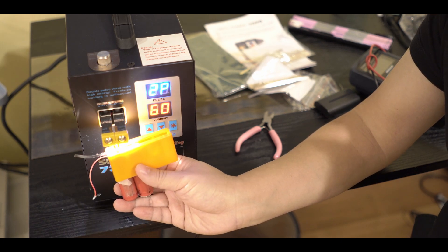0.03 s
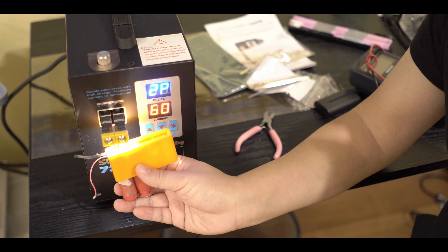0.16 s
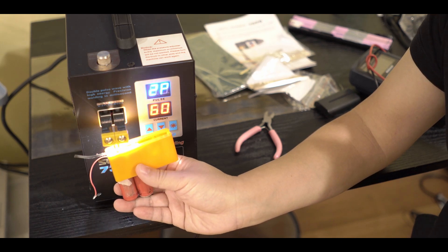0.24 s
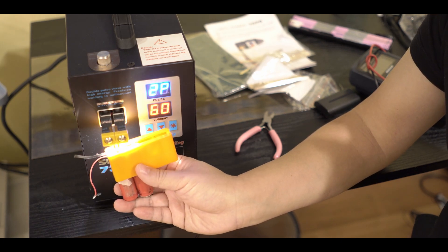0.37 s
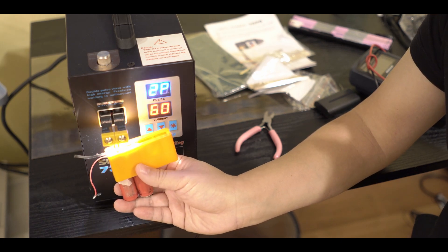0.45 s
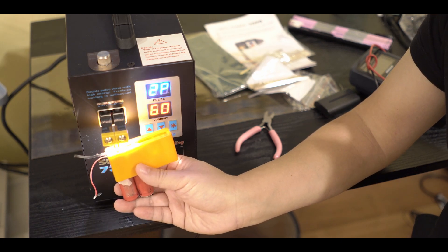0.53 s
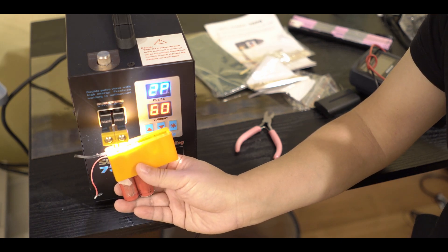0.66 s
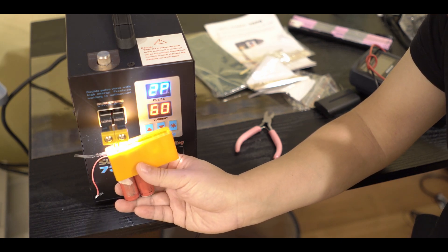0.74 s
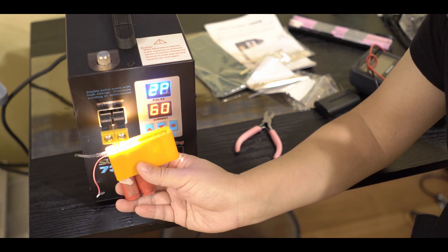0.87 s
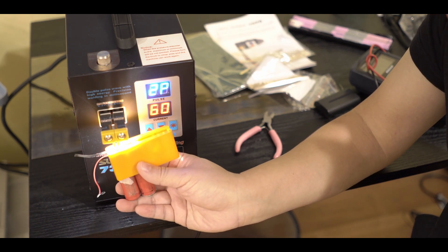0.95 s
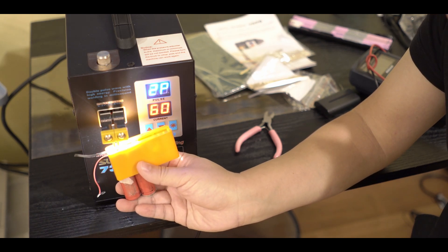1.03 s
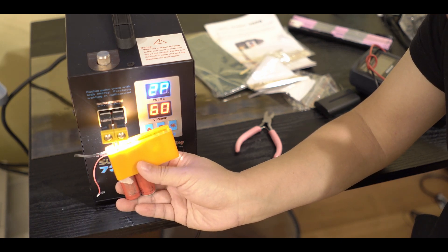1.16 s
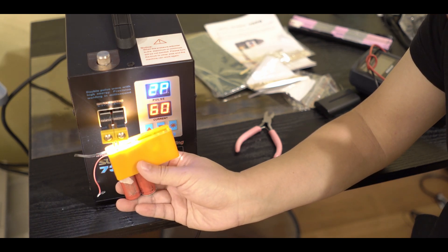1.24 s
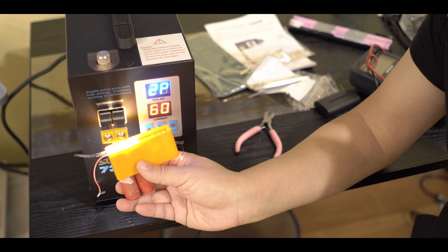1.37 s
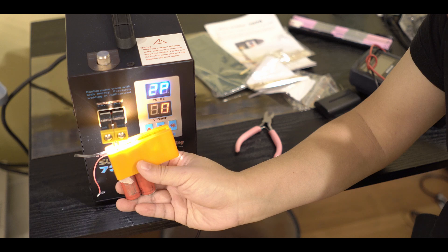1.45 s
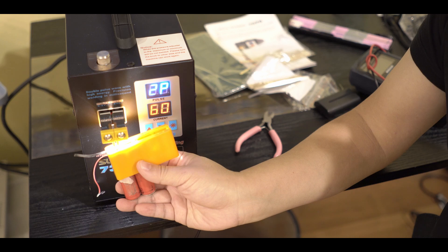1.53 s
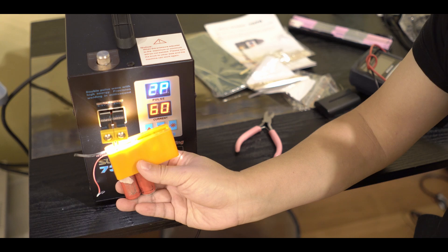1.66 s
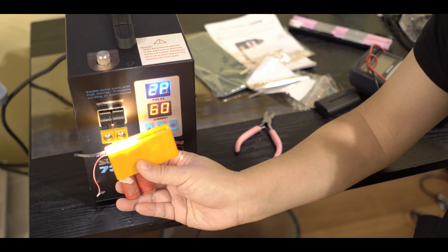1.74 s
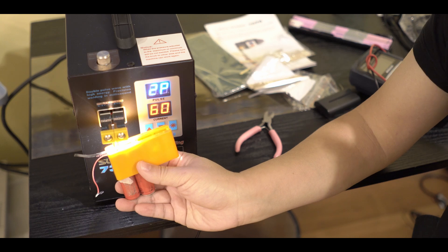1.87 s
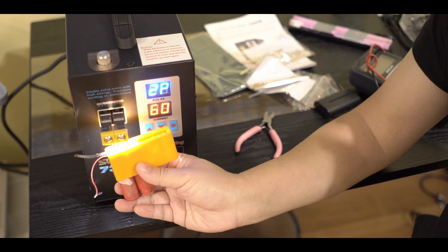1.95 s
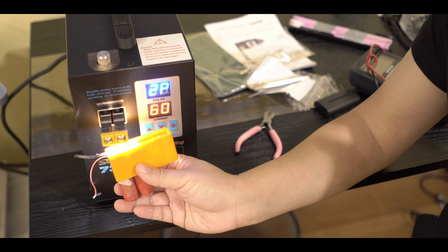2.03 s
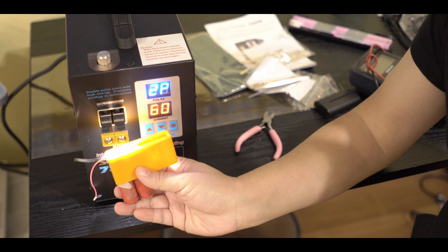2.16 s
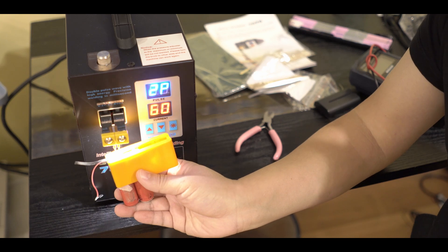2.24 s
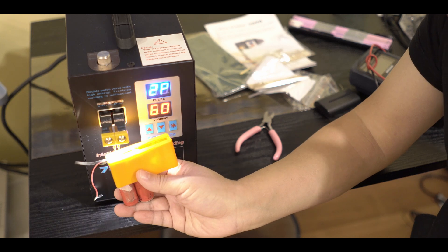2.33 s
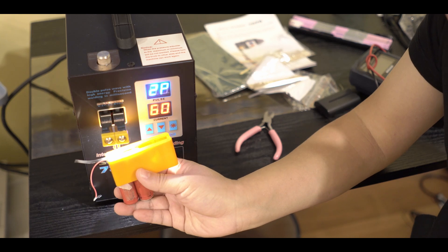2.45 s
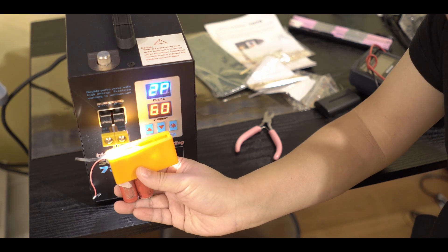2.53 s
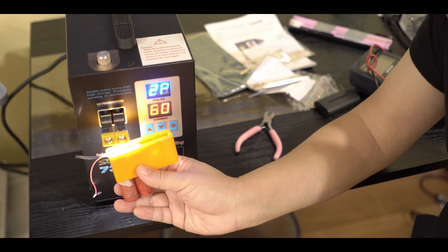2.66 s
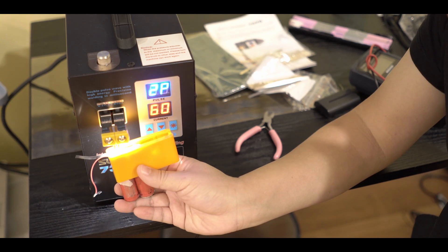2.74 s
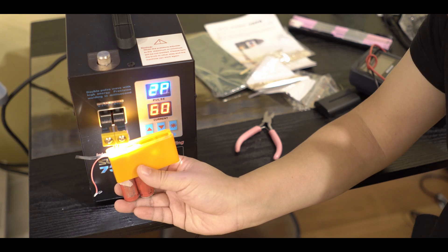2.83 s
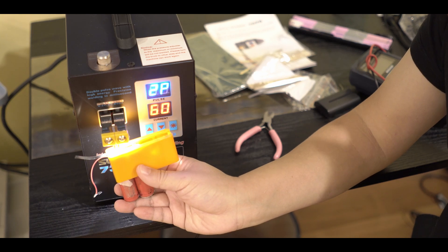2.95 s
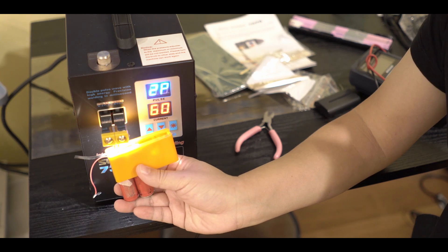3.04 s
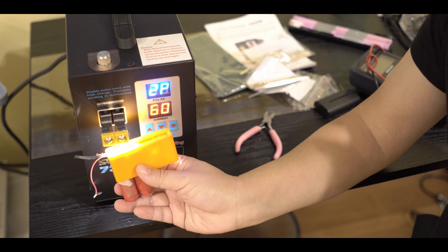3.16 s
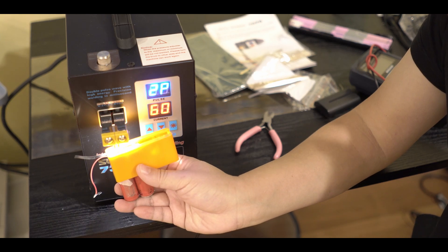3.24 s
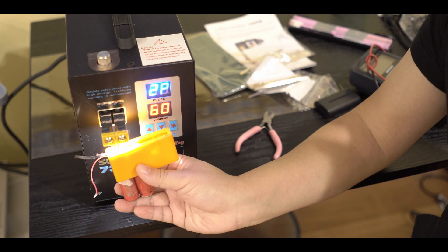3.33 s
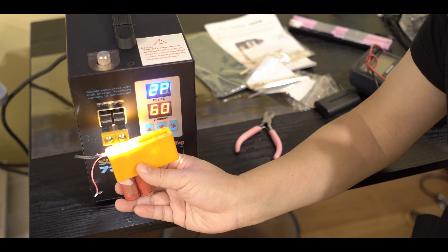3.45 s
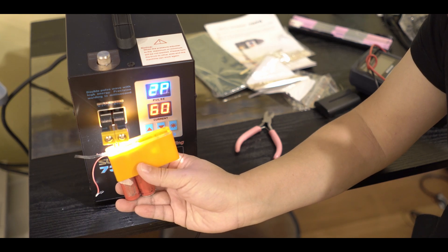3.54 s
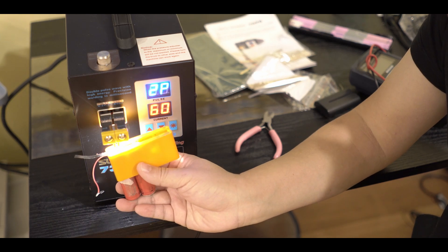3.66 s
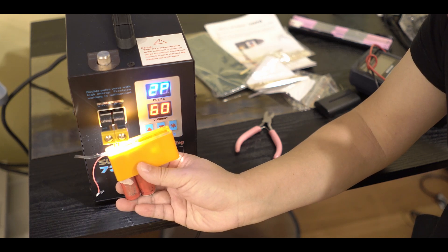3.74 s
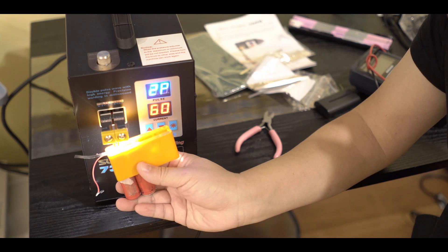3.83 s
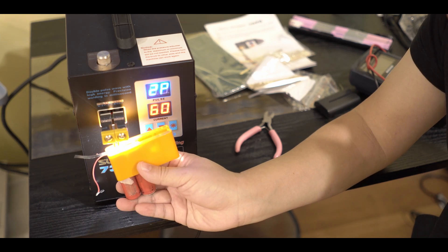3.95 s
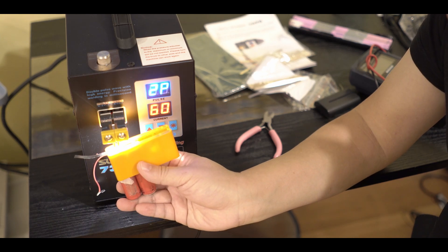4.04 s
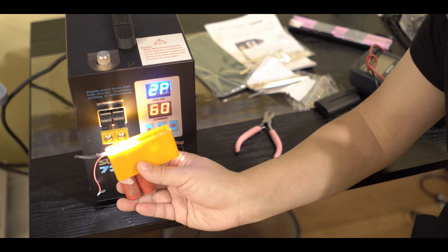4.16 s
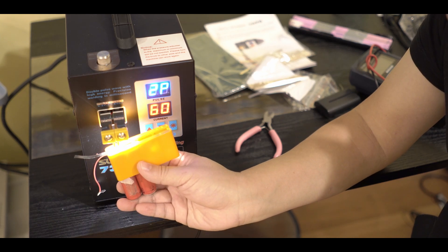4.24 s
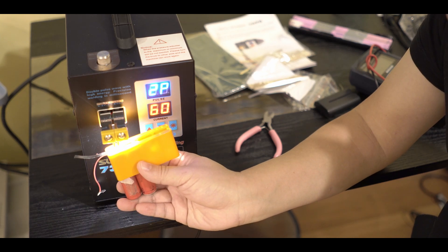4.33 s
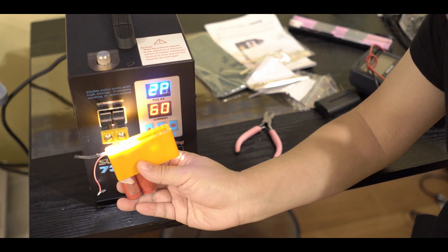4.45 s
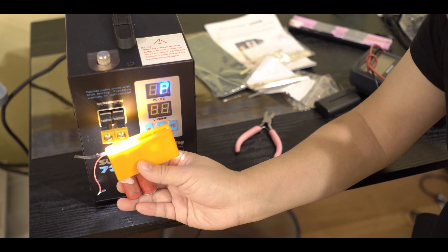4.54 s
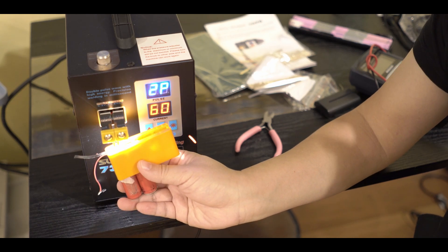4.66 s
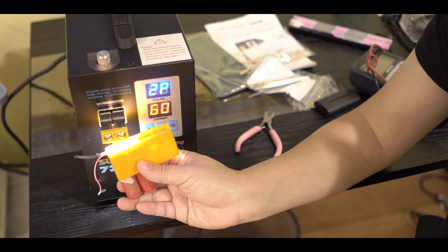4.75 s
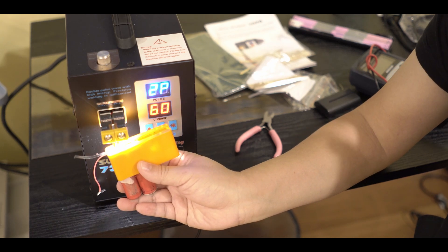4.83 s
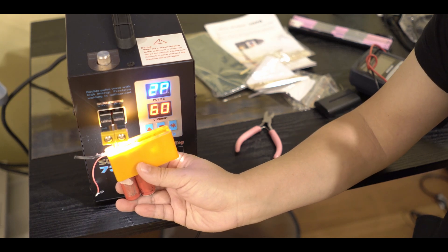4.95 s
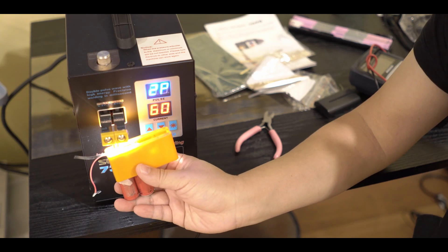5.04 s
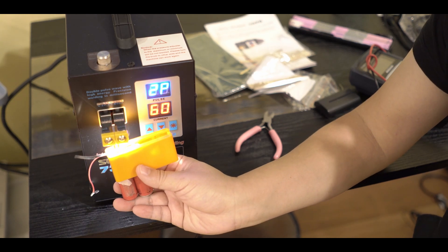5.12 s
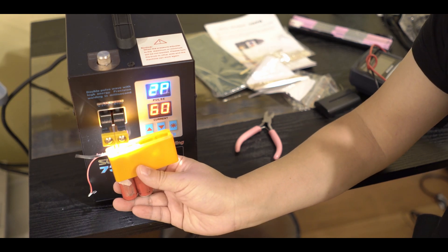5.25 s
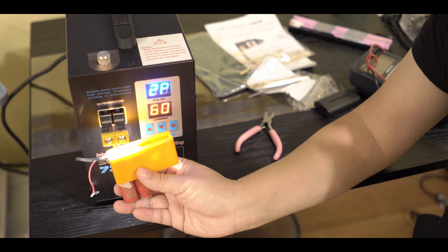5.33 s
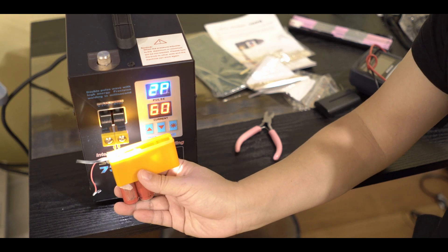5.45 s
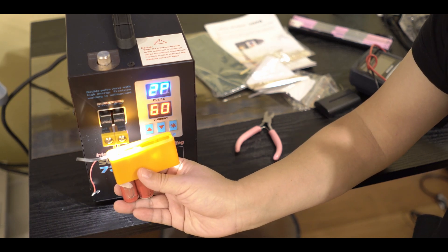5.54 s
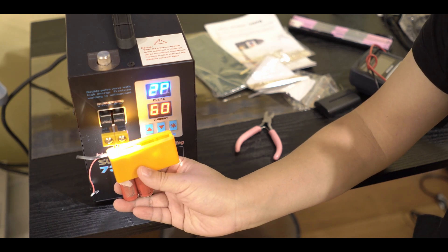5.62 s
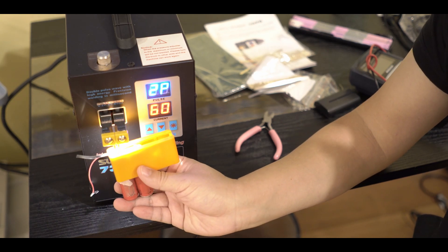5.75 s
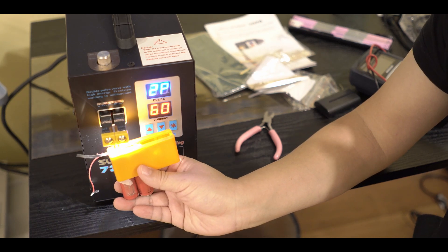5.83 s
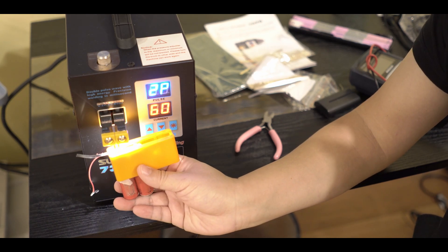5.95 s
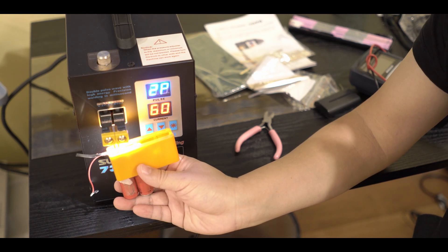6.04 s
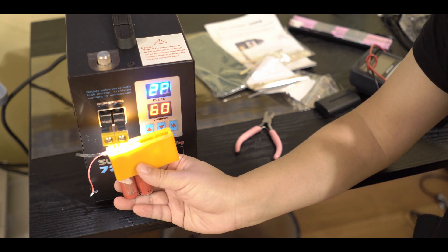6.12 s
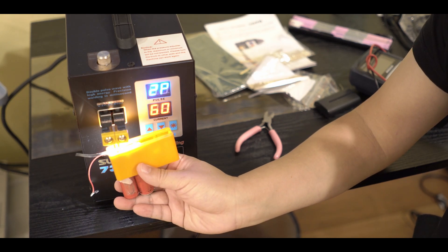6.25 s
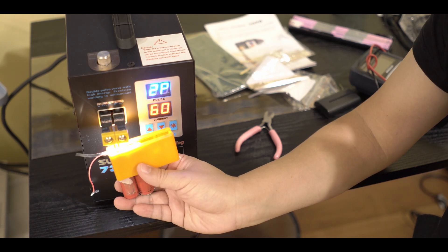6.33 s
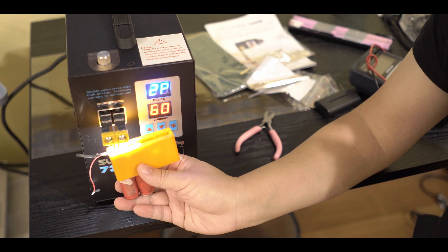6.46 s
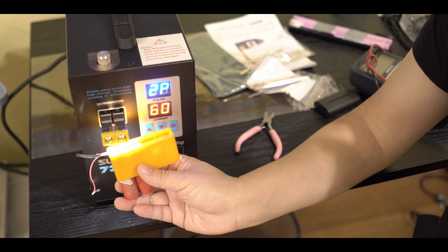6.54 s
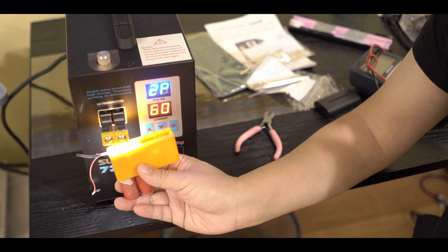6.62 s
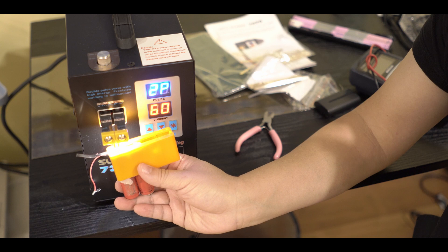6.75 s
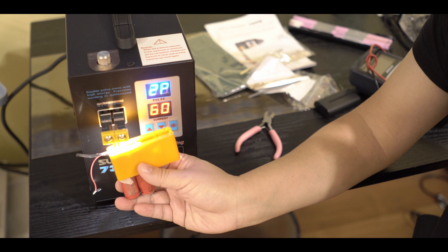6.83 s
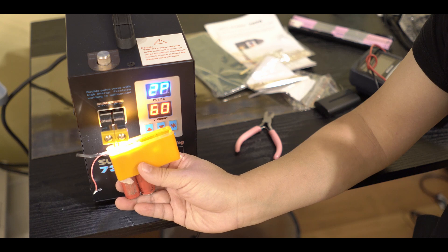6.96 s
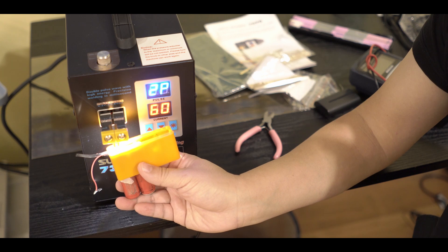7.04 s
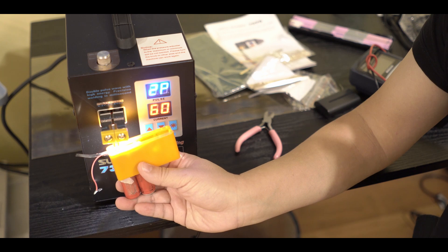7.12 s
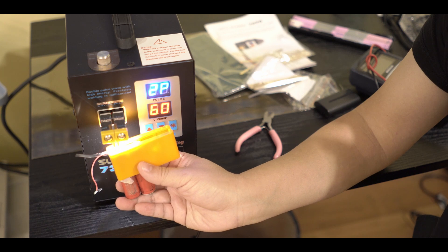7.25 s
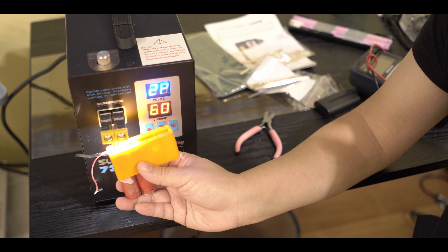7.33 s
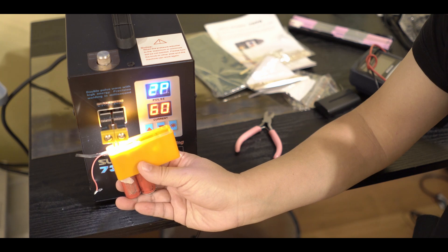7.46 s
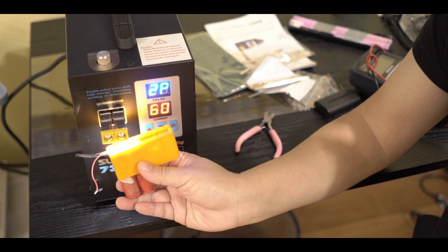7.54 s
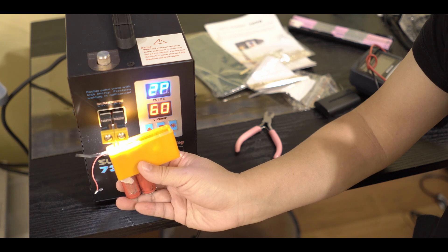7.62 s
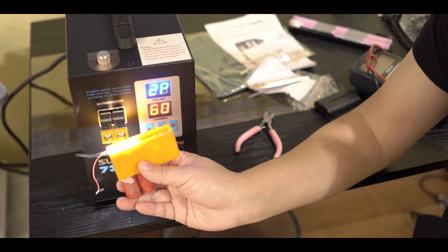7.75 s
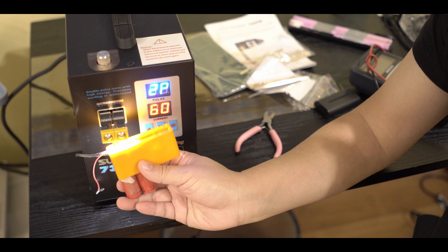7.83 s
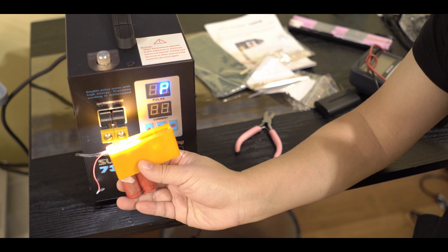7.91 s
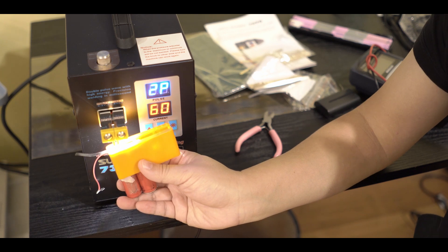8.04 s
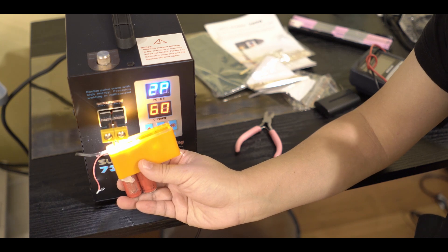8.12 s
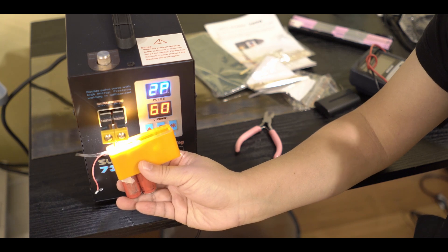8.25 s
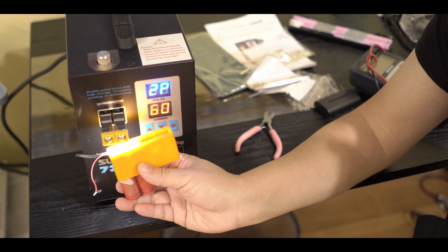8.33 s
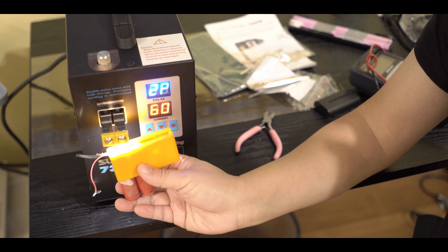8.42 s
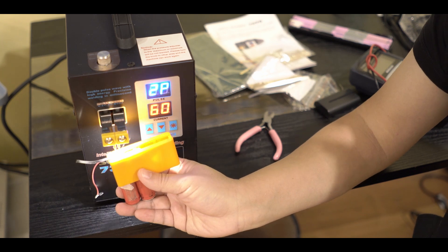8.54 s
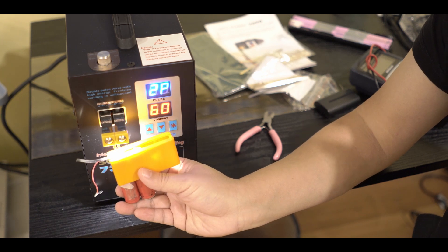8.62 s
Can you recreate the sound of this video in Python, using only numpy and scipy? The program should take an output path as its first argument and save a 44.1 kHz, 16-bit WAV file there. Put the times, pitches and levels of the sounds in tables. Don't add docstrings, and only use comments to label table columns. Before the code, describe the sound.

Close to a workbench indoors, a soft low fan rush is broken by three irregular bursts of loud metallic clacks, roughly three seconds apart. Each burst packs several hard snaps into under half a second, with bright pinging, sheet-metal ring and a dull, short thud beneath. Nearby hard walls return a quick tail. Tiny dry contact ticks are scattered around the bursts, and the fan continues to the end.

```python
import sys
import numpy as np
from scipy import signal
from scipy.fft import rfft, irfft
from scipy.io import wavfile
from scipy.ndimage import uniform_filter1d

SR = 44100
rng = np.random.default_rng(int(sys.argv[2]) if len(sys.argv) > 2 else 0)


def ratio_of_db(decibels):
    return 10 ** (np.asarray(decibels, float) / 20)


def master_out(mix):
    frames = np.transpose(np.atleast_2d(mix))
    ceiling = np.clip(frames, -1, 1)
    pcm = np.round(ceiling * 32767).astype(np.int16)
    wavfile.write(sys.argv[1], SR, pcm)


N = 382947
TIME = np.arange(SR // 2) / SR


def ring(hz, t60, rise):
    swell = 1 - np.exp(-TIME / rise)
    decay = np.exp(-np.log(1000) * TIME / t60)
    return swell * decay * np.sin(2 * np.pi * hz * TIME)


def add(track, start_s, sound):
    part = track[int(start_s * SR):][:len(sound)]
    part += sound[:len(part)]


def shaped(size, gain_of_hz):
    hz = np.maximum(np.arange(size // 2 + 1) * SR / size, 1)
    return irfft(rfft(rng.standard_normal(size)) * gain_of_hz(hz), size)


# frequency in Hz, density in dB per Hz.
FAN_SPECTRUM = [(25, -17), (48, -11), (150, 3.5), (600, -9.5), (2600, -11.5), (4250, -18.5), (14400, -48.5),
                (16000, -60)]


def fan():
    level_db = -48
    hz, db = np.transpose(FAN_SPECTRUM)
    rush = shaped(N + N % 2, lambda f: ratio_of_db(np.interp(np.log(f), np.log(hz), db)))[:N]
    swell_db = np.interp(np.arange(N), np.linspace(0, N, 30), 0.3 * rng.standard_normal(30))
    return rush / rush.std() * ratio_of_db(level_db + swell_db)


# band centre in Hz, t60 in seconds, level in dB.
ROOM_BANDS = [(250, .45, -31), (600, .45, -31), (1200, .46, -29.5), (2200, .46, -29.5), (3500, .5, -30),
              (5000, .5, -30), (7500, .42, -30), (11000, .36, -31)]
# delay in seconds, level in dB.
NEAR_ECHOES = [(.0026, -5), (.0058, -11), (.0115, -14), (.016, -14)]


def room():
    centres = np.log([row[0] for row in ROOM_BANDS])
    tail = 0
    for k, (hz, t60, db) in enumerate(ROOM_BANDS):
        only_this = np.arange(len(ROOM_BANDS)) == k
        band = shaped(len(TIME), lambda f: np.sqrt(np.interp(np.log(f), centres, only_this)))
        tail = tail + ratio_of_db(db) * band * np.exp(-np.log(1000) * TIME / t60)
    response = tail * (1 - np.exp(-TIME / 0.009))
    response[0] = 1
    for delay, db in NEAR_ECHOES:
        response[int(delay * SR)] += ratio_of_db(db)
    return response


# start in seconds, level in dB, pitch in Hz.
SHUDDERS = [(1.529, -33, 290), (1.559, -47, 268), (1.6, -31, 264), (1.831, -43, 380), (4.545, -39.5, 420),
            (4.565, -32.5, 280.5), (4.632, -36, 348), (4.805, -40, 430), (7.946, -34, 286),
            (7.973, -37, 403), (8.013, -32.5, 266), (8.049, -48.5, 350), (8.252, -34, 415)]


def transformer():
    out = np.zeros(N)
    for s, db, hz in SHUDDERS:
        add(out, s, ratio_of_db(db + 2.5) * ring(hz, 0.078, 0.0013))
    return out


# start in seconds, level in dB.
COVER_RINGS = [(1.5259, -9.5), (1.714, -14), (4.571, -10.5), (4.7287, -9), (7.9678, -21), (8.2132, -19.5),
               (8.2506, -7)]
# cover mode in Hz, level in dB, t60 in seconds.
COVER_TONES = [(2048, 0, .13), (2092, 0, .15), (2130, -4, .1), (1030, -10, .08), (950, -12, .08)]


def cover():
    out = np.zeros(N)
    for s, db in COVER_RINGS:
        for hz, mode_db, t60 in COVER_TONES:
            add(out, s, ratio_of_db(db + mode_db - 13) * ring(hz, t60, 0.00052))
    return out


# start in seconds, level in dB, pitch in Hz.
PANEL_BOOMS = [(1.5, -21, 1356), (1.528, -29, 1380), (1.833, -25.5, 950), (4.531, -26, 1400),
               (4.571, -25, 1480), (8.176, -21.5, 940), (8.251, -18.5, 1023)]


def panel():
    out = np.zeros(N)
    for s, db, hz in PANEL_BOOMS:
        add(out, s, ratio_of_db(db + 3.5) * ring(hz, 0.036, 0.0011))
    return out


# start in seconds, level in dB, pitch in Hz.
TONGUE_RINGS = [(1.5084, -13.5, 4640), (1.6508, -8.5, 3110), (1.6643, -11, 4040), (1.8207, -22, 4400),
                (1.8314, -9.5, 4150), (4.5456, -7.5, 4640), (4.7283, -8.5, 4000), (4.737, -17, 3970),
                (4.81, -6, 4460), (4.8227, -23, 4150), (7.926, -9.5, 4420), (8.2452, -10, 5100),
                (8.2674, -17, 4270), (7.8526, -30, 5600)]


def tongue():
    out = np.zeros(N)
    for s, db, hz in TONGUE_RINGS:
        lower = ring(hz, 0.0099, 0.00093)
        upper = ratio_of_db(-9) * ring(1.155 * hz, 0.003, 0.0013)
        add(out, s, ratio_of_db(db + 1) * (lower + upper))
    return out


def share_out(rows, kind):
    shared = []
    for s, db, weight_db, hard_db in rows:
        part_db = db + np.array([1, weight_db, hard_db]) @ np.array(kind)
        shared.append((s, *part_db))
    return shared


def blows(table, parts, rattle_db, rattle_t60, size=2048):
    out = np.zeros(N)
    f = np.arange(size // 2 + 1)[:, None] * SR / size
    hz, width, db = np.transpose(parts)
    resonance = (1 + (2 * (f - hz) / width) ** 2) ** -2 * (SR / width) ** 2
    low_cut = (1 + (300 / (f[:, 0] + 1)) ** 4) ** -1
    rattle_decay = ratio_of_db(rattle_db) * np.exp(-np.log(1000) * TIME[:size] / rattle_t60)
    chance = rng.standard_normal((len(table), 2, size))
    for (s, *strength_db), (bumps, grit) in zip(table, chance):
        part_db = db + np.append(strength_db, strength_db[-1]) - 3.5
        power = low_cut * (resonance @ ratio_of_db(2 * part_db))
        ripple_db = 3.5 * uniform_filter1d(bumps[:len(f)], size=9)
        cepstrum = irfft(np.log(np.sqrt(power) * ratio_of_db(ripple_db)))
        cepstrum[1:size // 2] *= 2
        click = irfft(np.exp(rfft(cepstrum[:size // 2], size)))
        push = grit * rattle_decay
        push[0] = 1
        push = rfft(push)
        colour = np.sqrt(uniform_filter1d(abs(push) ** 2, size=19))
        push = irfft(push / colour)
        add(out, s, signal.fftconvolve(click, push[:size // 2]))
    return out


# start in seconds, level, weight and hardness in dB.
ELECTRODE_TICKS = [(1.1516, -36.5, -13, -17), (2.0373, -33.5, -19, -8), (2.1613, -46, -8, 0),
                   (2.1698, -38.5, 9, -14), (2.7494, -51, -2, 1), (4.4437, -36, -18, -32),
                   (4.9677, -41.5, -20, 0), (5.0746, -34, -22, -13.5), (5.1555, -56, 19, -1),
                   (6.0147, -49, 3, -12), (7.7574, -37, -17, -18), (8.381, -33.5, -16, -6)]
# level in dB, share of weight, share of hardness (-1 to 1); one column per part.
TICK_SHARES = [(0, 0, -0.86, 0, -9), (0, 0.64, 0.41, 0.16, -0.27), (0, 0, 0, 1, 0.07)]
# resonance in Hz, width in Hz, level in dB.
TICK_RESONANCES = [(3680, 690, -0.5), (1150, 750, -8.5), (2860, 760, 1.5), (5330, 1200, -3),
                   (6050, 3300, 3.5), (11000, 11000, -11.5)]


def ticks():
    return ratio_of_db(4.5) * blows(share_out(ELECTRODE_TICKS, TICK_SHARES), TICK_RESONANCES, 1, 0.016)


# start in seconds, level, weight and hardness in dB.
LEVER_KNOCKS = [(1.4989, -19, -3, -5), (1.5259, -8.5, -9.5, -12), (1.5426, -21, -7, -6),
                (1.6513, -15.5, -5.5, -2.5), (1.8052, -32, 4.5, -17), (4.501, -41.5, 6, 9),
                (4.5302, -14.5, -11, -12), (4.5718, -8.5, -8.5, -22), (7.851, -33.5, -20, 4),
                (7.8983, -25, -5, -2), (8.0115, -27, -1, -13), (8.0893, -36, 1.5, -6), (8.1715, -34, 2, -4),
                (8.1765, -21, -6, -2), (8.2144, -28, 0, -5), (8.2522, -18.5, -3, -15),
                (8.2545, -14.5, -21, -1)]
# start in seconds, level, weight and hardness in dB.
HOUSING_SLAMS = [(1.4736, -31, -1, -29), (1.713, -16.5, -6, -23), (1.8339, -19, -3.5, -30),
                 (4.7295, -12, -5, -39), (4.7967, -27.5, 1, -30), (7.9678, -17, -9, -28),
                 (8.2326, -14.5, -8.5, -37)]
# start in seconds, level, weight and hardness in dB.
SPRING_SNAPS = [(1.5098, -10.5, -25, -16), (1.6624, -26, -4, -19), (1.8193, -13.5, -10.5, -12.5),
                (4.5474, -11.5, -21, -13.5), (4.8088, -20.5, -2.5, -6), (4.8223, -15, -38, -23),
                (7.9262, -11, -20, -11), (8.2435, -12, -27, -16)]
# level in dB, share of weight, share of hardness (-1 to 1).
LEVER_SHARES = [(0, 0, -6, 0.1, -39), (0, 1, 0.1, 0.039, 0.5), (0, 0, .3, 1, -1)]
HOUSING_SHARES = [(-4, 0, 0, -10.5, 0), (0.7, 0.91, 0, 0.5, 0), (0, 0, 0.0044, -0.2, 0.92)]
SPRING_SHARES = [(-4, 0, -8.5, 0, 0), (0.2, 1, 0.5, 0, 0.019), (-0.1, 0.037, 0, 0, 1)]
# resonance in Hz, width in Hz, level in dB.
SNAP_RESONANCES = [(2920, 1920, 1.5), (1012, 990, -1), (2117, 900, 0.5), (4505, 1480, -2),
                   (7570, 1230, -6.5), (11800, 2600, -17)]


def snaps():
    struck = share_out(LEVER_KNOCKS, LEVER_SHARES)
    struck += share_out(HOUSING_SLAMS, HOUSING_SHARES)
    struck += share_out(SPRING_SNAPS, SPRING_SHARES)
    return blows(sorted(struck), SNAP_RESONANCES, -10.5, 0.010)


def scene():
    small = tongue() + panel() + cover() + transformer() + ticks()
    walls = room()
    near_walls = walls * np.where(TIME > 0.008, ratio_of_db(-6), 1)
    snaps_in_room = signal.fftconvolve(snaps(), walls)[:N]
    small_in_room = signal.fftconvolve(small, near_walls)[:N]
    return (snaps_in_room + small_in_room + fan())[None]


def band_limit(x):
    return signal.sosfilt(signal.butter(12, 16410, fs=SR, output="sos"), x)


# start in seconds, length in seconds, lost above Hz.
TREBLE_GAPS = [(0.154, 0.01, 7100), (0.388, 0.013, 5300), (0.924, 0.01, 6500), (0.988, 0.01, 5430),
               (1.028, 0.011, 5500), (1.115, 0.013, 6400), (1.286, 0.012, 8100), (1.462, 0.014, 6760),
               (1.779, 0.0086, 5430), (3.077, 0.01, 6800), (3.31, 0.013, 5200), (3.695, 0.012, 5300),
               (3.953, 0.011, 7400), (4.058, 0.011, 5700), (5.125, 0.011, 7100), (5.235, 0.029, 6300),
               (5.634, 0.033, 6240), (5.849, 0.01, 5650), (5.89, 0.01, 6400), (6.016, 0.01, 5400),
               (6.104, 0.013, 6140), (6.533, 0.035, 6400), (6.982, 0.013, 6800), (7.194, 0.015, 6900),
               (1.883, .008, 7800), (4.797, 0.0064, 8500)]


def record(dry):
    out = signal.sosfilt(signal.ellip(8, 0.2, 60, 15800, fs=SR, output="sos"), dry)
    for s, length, hz in TREBLE_GAPS:
        start = int((s - 0.02) * SR)
        size = int((length + 0.045) * SR)
        high_pass = signal.butter(8, hz, "high", fs=SR, output="sos")
        treble = signal.sosfiltfilt(high_pass, out[:, start:start + size])
        edge_s = np.minimum(np.arange(size), np.arange(size)[::-1]) / SR
        fade = np.sin(np.pi / 2 * np.clip((edge_s - 0.012) / 0.021, 0, 1)) ** 2
        out[:, start:start + size] -= treble * fade
    return band_limit(out)


dry = scene()
out = record(dry)
master_out(out)
```